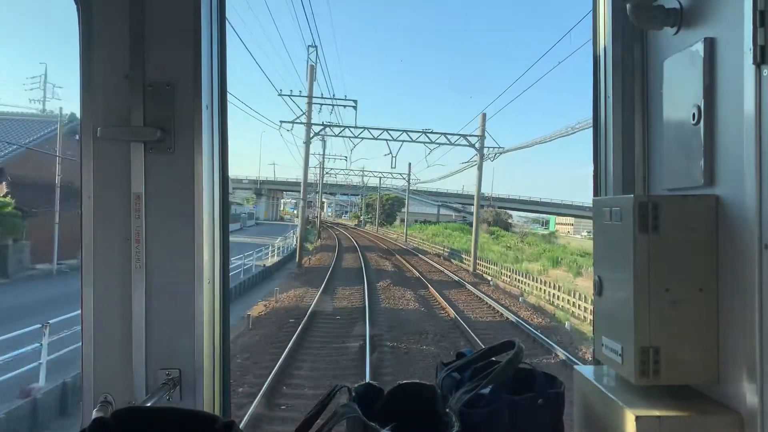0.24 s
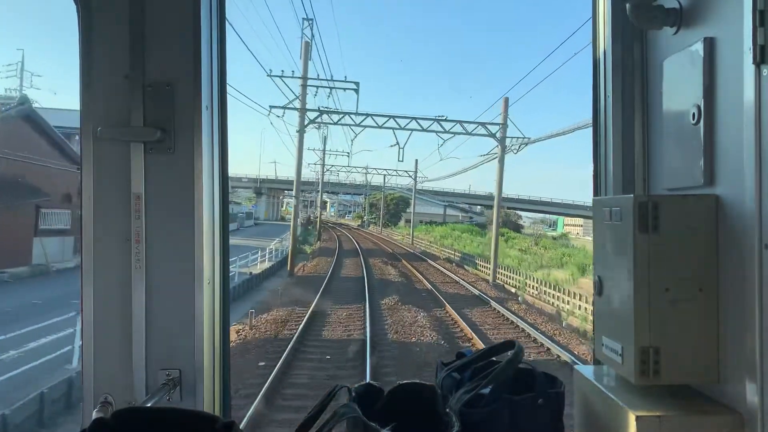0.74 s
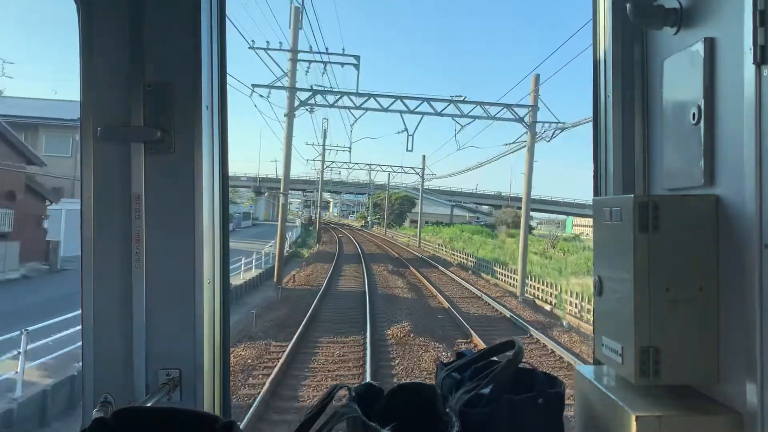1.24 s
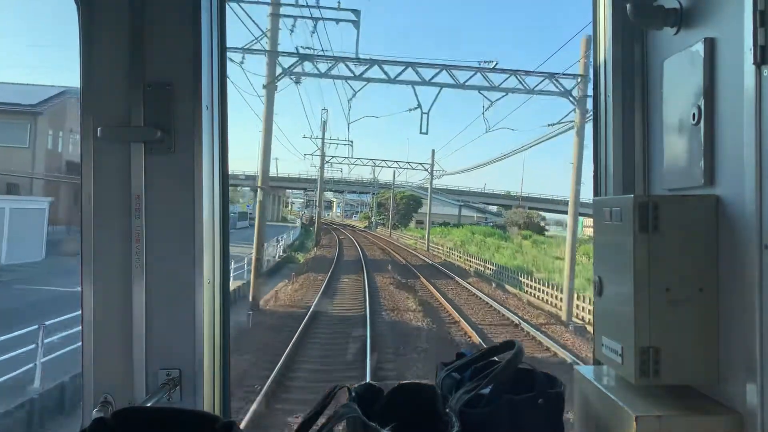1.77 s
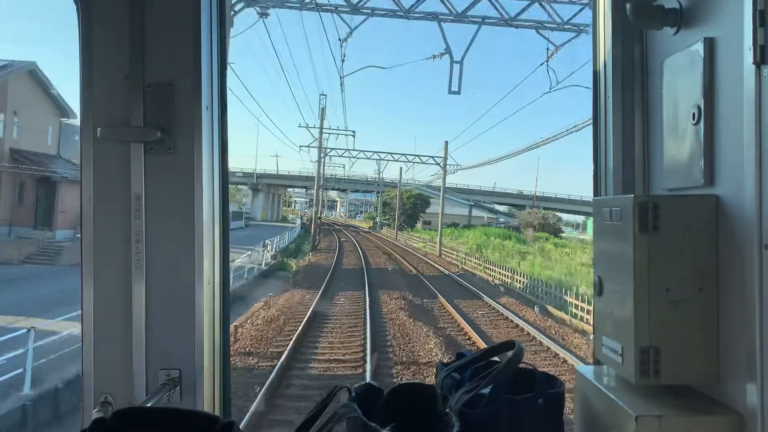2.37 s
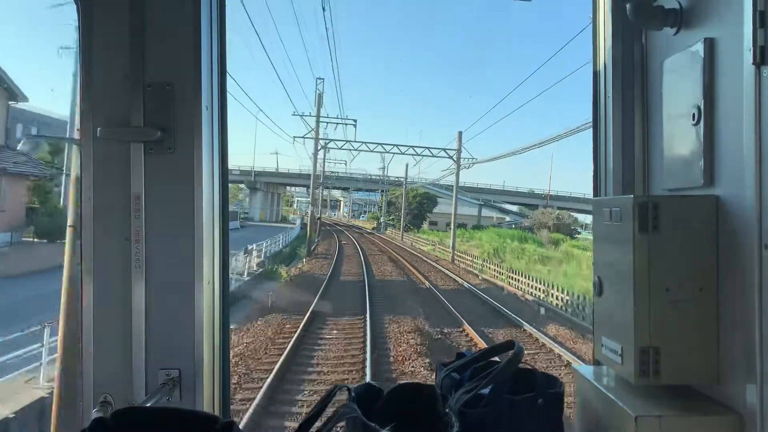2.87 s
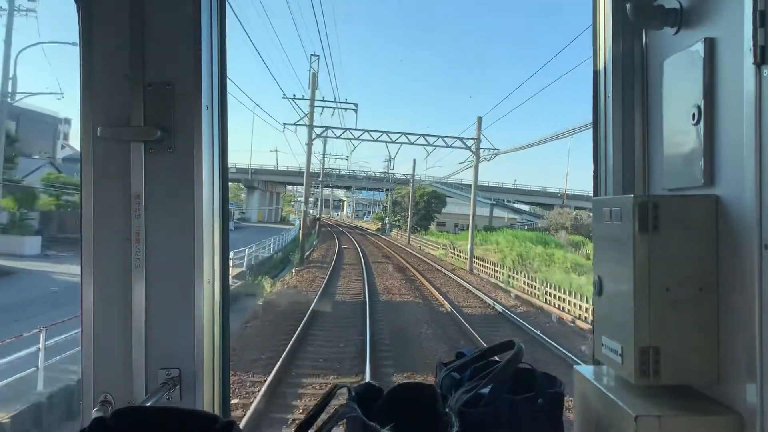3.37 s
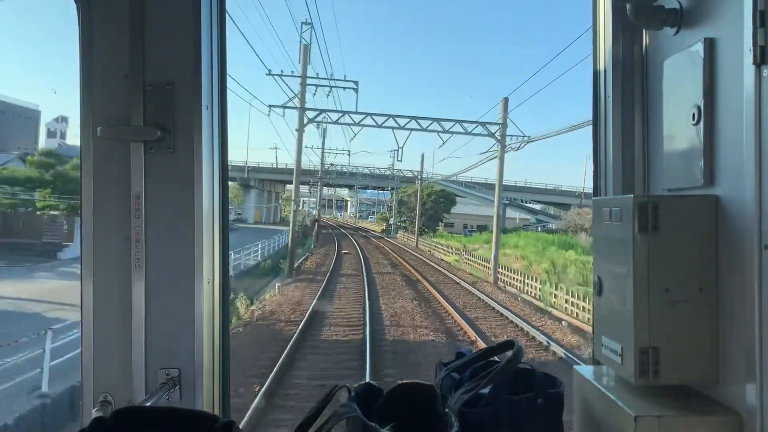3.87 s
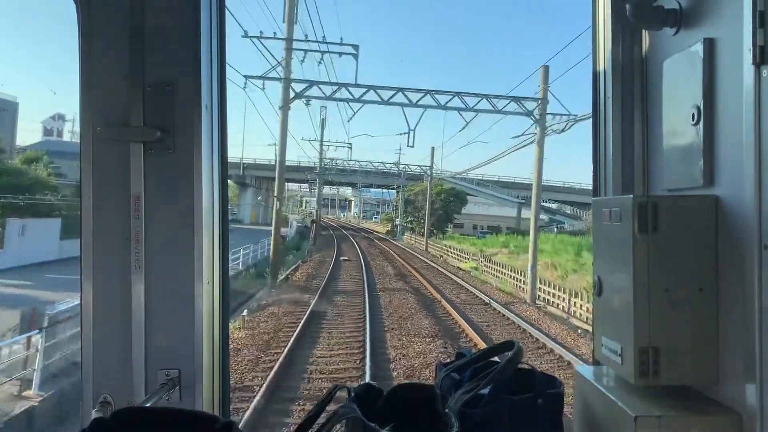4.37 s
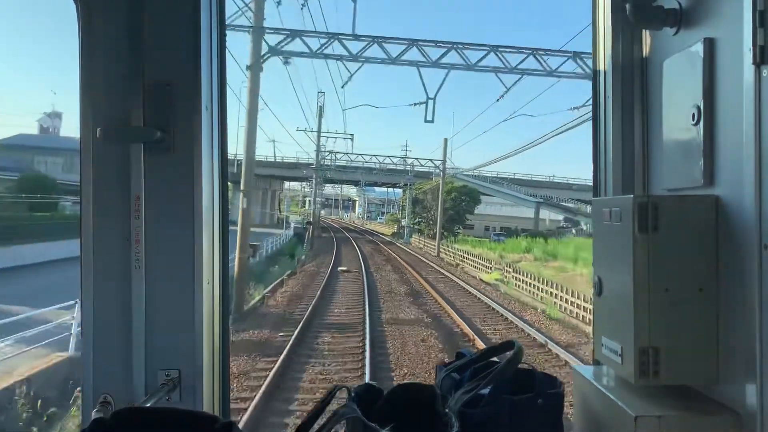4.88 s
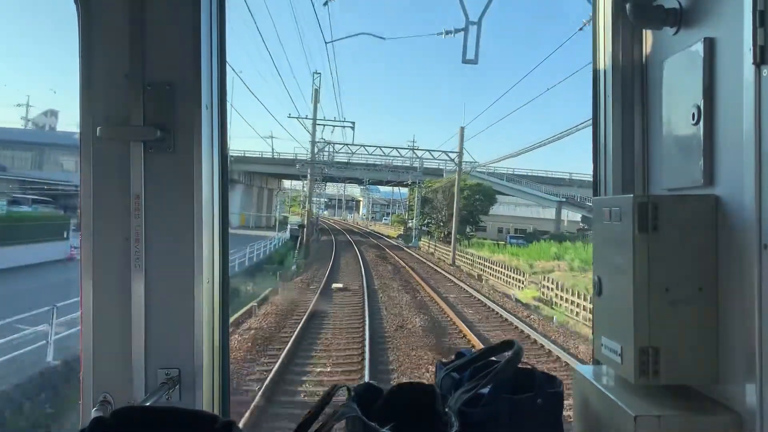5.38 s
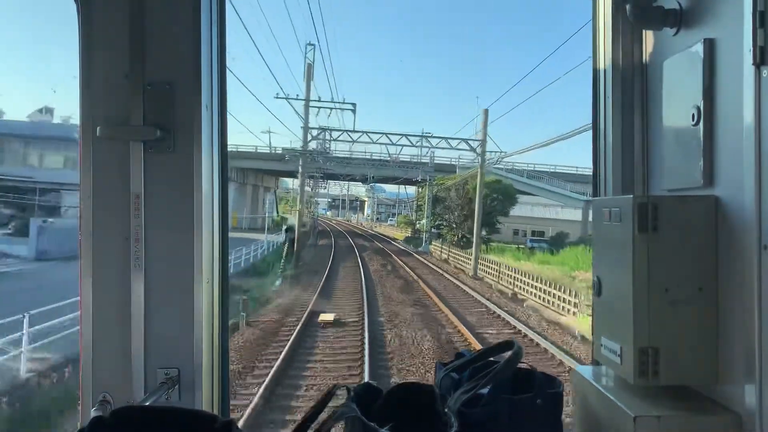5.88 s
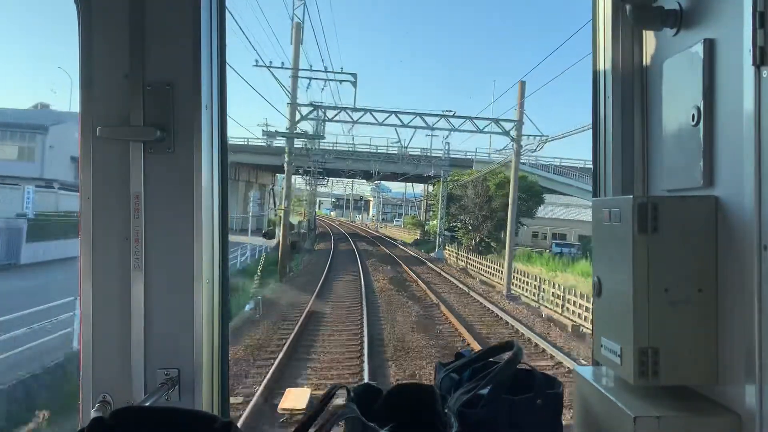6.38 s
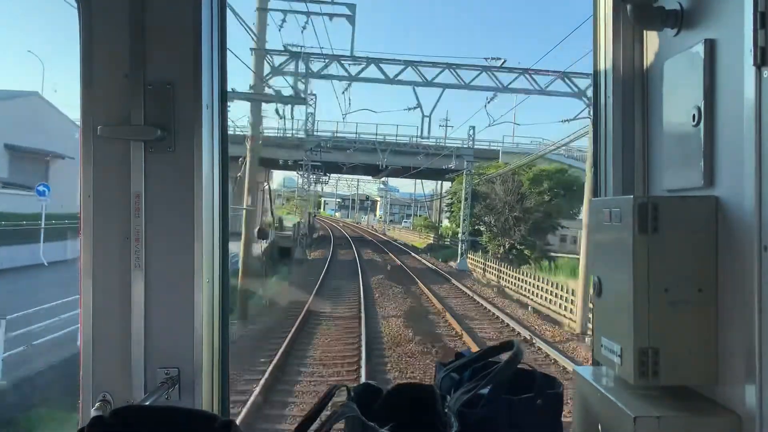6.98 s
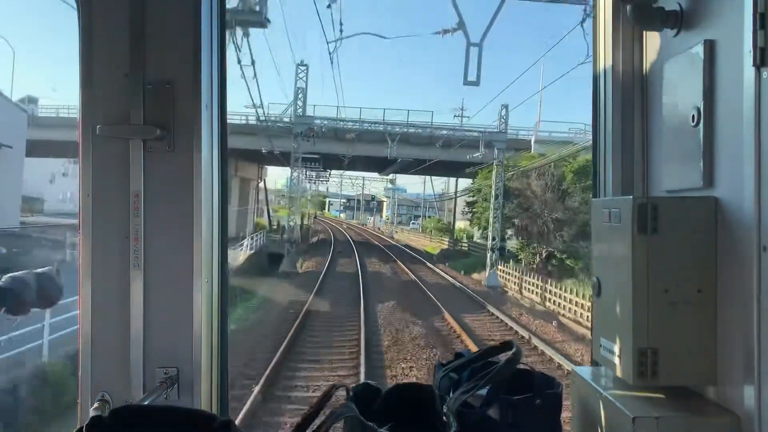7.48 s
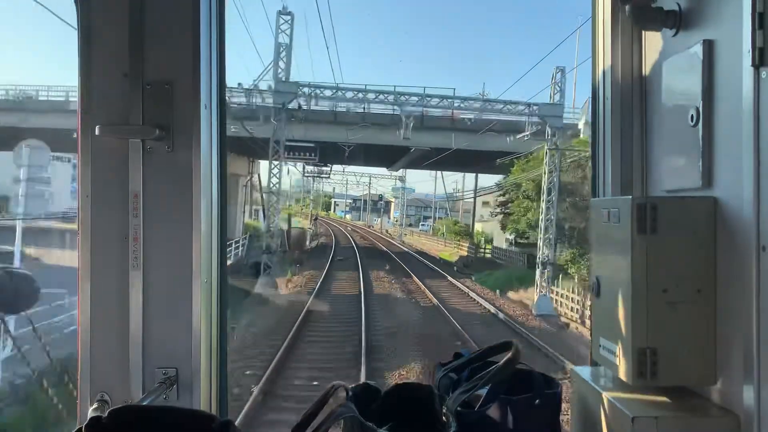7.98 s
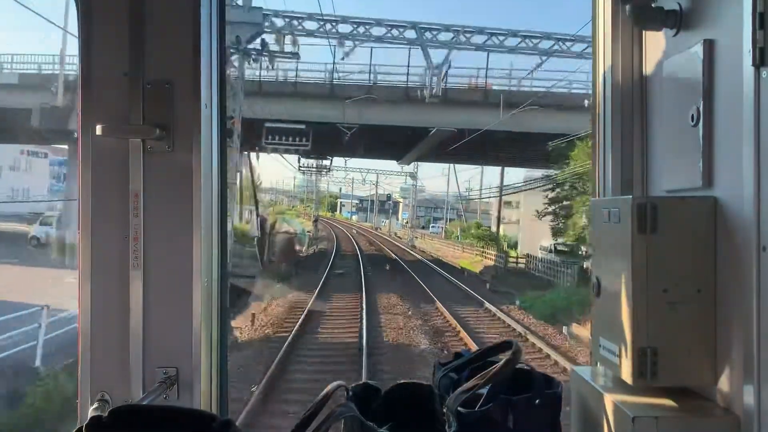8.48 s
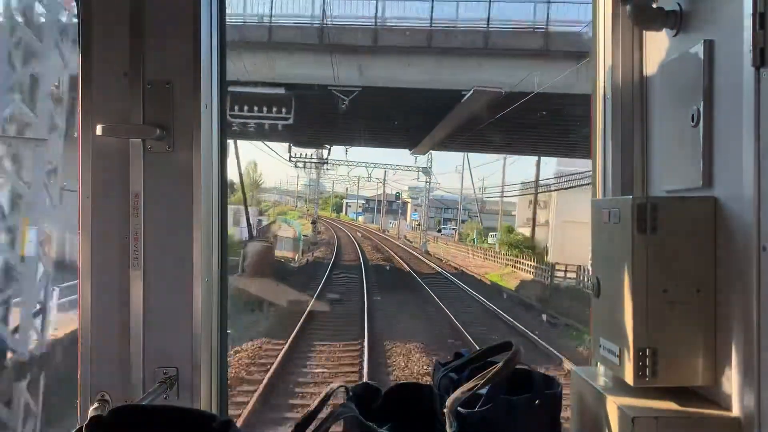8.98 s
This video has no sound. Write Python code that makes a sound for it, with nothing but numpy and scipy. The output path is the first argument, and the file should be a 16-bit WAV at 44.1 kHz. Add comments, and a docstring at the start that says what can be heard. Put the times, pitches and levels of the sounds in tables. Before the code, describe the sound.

Heard inside the front of an electric commuter train at steady speed. A deep, booming rumble and wheel roar never stop, under a low motor drone and a mid-pitched gear whine that flutters quickly. Around two to five seconds thin metallic flange hisses swell and cut off while the floor thumps in a cluster. Later the motor hum surges, more thumps follow, and the rail hiss rises slightly near a bridge. Wide, close stereo cab sound.

```python
"""The body and floor of an electric commuter train boom in resonance and thump over dips as it rolls in a bend.
Wheels roar and hiss as shaped noise; flanges hiss against the outer rail in swells that also ring the wheel.
Motor shafts drone as slowly beating tones, and two gear whines close in frequency beat against each other.
The auxiliary supply hums in even harmonics beside fans and two thin whines.
Cab fittings tick now and then as short decaying bursts; all is heard at two points in the cab."""
import sys
import numpy as np
from scipy import signal
from scipy.fft import rfft, irfft, next_fast_len
from scipy.io import wavfile
from scipy.ndimage import uniform_filter1d, map_coordinates

SR = 44100
rng = np.random.default_rng(int(sys.argv[2]) if len(sys.argv) > 2 else 0)


def wav_record(signal):
    """Record a signal, one row per channel, as 16-bit PCM in the file named by sys.argv[1]."""
    frames = np.transpose(np.atleast_2d(signal))
    bounded = np.clip(frames, -1, 1)
    # unit amplitude maps onto the largest positive 16-bit level
    quanta = np.round(bounded * 32767).astype(np.int16)
    wavfile.write(sys.argv[1], SR, quanta)


N = 407043
TIME = np.arange(N) / SR

# two listening points in the cab: [f/Hz, likeness 0-1, left lead/rad, left minus right level/dB]
PORTS = [(32, 0.95, -0.1, -2), (50, 0.92, 1, 0), (92, 0.96, -0.47, -2.5), (161, 0.87, 0.62, -5),
         (253, 0.51, 0, -1), (356, 0.86, 0.84, -1.5), (470, 0.49, 1, 1.3), (700, 0.44, 1.4, 0.7),
         (1030, 0.15, 1.75, 1), (1440, 0.41, 3.5, -1.5), (1696, 0.08, 5, 0.5), (2870, 0.39, 9.5, 3),
         (4350, 0.1, 12, 0), (5270, 0.31, 15, -3.5), (6750, 0.3, 20, -1.5), (7900, 1, 21, 0),
         (9370, 1, 22.5, 2), (12800, .9, 28.5, -0.5), (15300, .9, 26, -0.5)]

# auxiliary supply: fundamental f/Hz, its multiples, and their levels [rms level/dB]
SUPPLY_HZ = 59.217
SUPPLY_ORDERS = (2, 6, 12, 14, 16, 18, 24, 30, 32, 60, 72)
SUPPLY_LEVELS = [-43, -41.5, -65.5, -61, -66.5, -65, -66.5, -81, -67.5, -75.5, -78]
# fans and shaking panels: [f/Hz, rms level/dB, flutter 0-1]
FAN_LINES = [(29.8, -46.5, .4), (37.7, -49, .5), (151.1, -43.5, .7), (229.4, -54.5, 1), (328.8, -56.5, 0.2),
             (546, -52.5, .9), (1370, -68.5, 0.5)]
# two thin whines: [lower f/Hz, upper f/Hz] and [t/s, lower mean level/dB, upper mean level/dB]
WHINE_HZ = (1658.1, 1687.7)
WHINE_LEVELS = [(0, -63, -63), (0.8, -60, -56), (1.6, -65, -56), (2.1, -61, -62), (2.7, -59, -55.5),
                (4.9, -56.5, -55.5), (5.25, -66, -66), (5.8, -61, -57.5), (9.23, -59.5, -58.5)]
WHINE_WAVER_DB, WHINE_SWAY_HZ = 1.5, 2.2

# blows on cab fittings, before the tilt to the left: [t/s, crack level/dB, knock level/dB]
TICKS = [(1.911, -40.5, -48), (2.328, -42.5, -48), (5.759, -34.5, -46), (7.258, -34.3, -37)]
# ringing of the fittings: [f/Hz, width/Hz, level/dB]
FITTING_MODES = [(2600, 700, -4), (3400, 800, 0), (4250, 700, 0)]
# panel that carries them: [f/Hz, width/Hz, level/dB]
PANEL_MODES = [(1100, 400, -1), (1850, 600, 0)]

# first gearbox whine: [t/s, level/dB, left minus right level/dB]
FIRST_GEAR = [(0, -44.3, -3), (2.4, -42.7, -4), (2.7, -51, 0), (4.3, -54, 0), (4.65, -60, 0), (5.6, -50, 0),
              (7.45, -46, 1), (7.8, -58, 0), (8.3, -48, 0), (9.23, -49, 0)]
# second gearbox whine: [t/s, level/dB, left minus right level/dB]
SECOND_GEAR = [(0, -49.5, -1), (2.1, -49, -1), (2.8, -64, 0), (8.1, -62, 4), (8.8, -47, 10),
               (9.23, -45.5, 10)]
# phase lead of the left: [first gearbox/rad, second gearbox/rad]
GEAR_LEADS = (1.75, -.3)
# mean tooth rate of the first gearbox, creeping up with speed: [t/s, f/Hz]
GEAR_PITCH = [(0, 682.3), (9.23, 685)]
# how far the second gearbox lags the first: [t/s, beat f/Hz]
GEAR_BEATS = [(0, 8.2), (1.2, 8.2), (1.45, 6.1), (2.4, 5.4), (7.5, 6), (8.7, 10)]
GEAR_IN_STEP_S = 1.118  # a moment at which the two are in step

# motor shaft, first order: [t/s, mean level/dB]
SHAFT_FIRST = [(0, -33), (1.7, -38.5), (2.15, -51), (2.7, -34), (4.4, -35.5), (6.8, -41.5), (9.23, -55)]
# motor shaft, second order: [t/s, mean level/dB]
SHAFT_SECOND = [(0, -29), (1.4, -32.5), (2.45, -29.5), (3.0, -40.5), (3.7, -34.5), (4.7, -45), (5.25, -48),
                (5.7, -35.5), (6.25, -24.5), (6.95, -33.5), (7.3, -40), (8.3, -45.5), (8.85, -35),
                (9.23, -36)]
# where each of the three orders stands: [left lead/rad, left minus right level/dB]
SHAFT_PLACES = [(-.1, -2.7), (.5, -4), (.35, -5)]
# third order of two motors: level before beating, beat period, a moment in step, depth 0-1
THIRD_DB, BEAT_S, IN_STEP_S, BEAT_DEPTH = -38.5, 2.18, 1.24, 0.85
MOTOR_WANDER_DB = 1

# ringing of the wheel: [f/Hz, width/Hz, level/dB]
WHEEL_MODES = [(4320, 70, -4), (4730, 90, -7), (5020, 60, -3), (5137, 45, -1.5), (5237, 35, 1.5),
               (5329, 35, 0), (5473, 40, -5), (5675, 60, -2), (5866, 40, -4.5), (6105, 70, -5),
               (6355, 45, -4), (6845, 45, -1.5), (7035, 50, -7), (7280, 70, -10), (7580, 60, -12)]
# steel scraping on steel: [f/Hz, level/dB per Hz]
SCRAPE_SPECTRUM = [(2000, -25), (3500, -2), (4500, 0), (5400, 0), (6500, -1), (7500, -3), (8200, -7),
                   (9300, -13), (10300, -5), (11300, -17), (13000, -20), (15700, -20)]
# sizzle that grows with hard pressure: [f/Hz, level/dB per Hz]
SIZZLE_SPECTRUM = [(8500, -40), (10300, 0), (11500, -12), (13300, -10), (14800, 1), (15700, 4)]
# flange leaning on the rail: [start t/s, build-up/s, hold/s, relative level/dB]
FLANGE_RUBS = [(1.8, 0.29, 0.23, -53.5), (2.195, 0.45, 0.8, -47.5), (2.6, 0.48, .4, -47),
               (3.693, 0.13, 0.29, -47.5), (4.441, 0.48, 0.045, -47.5), (5.277, .11, .14, -54),
               (6.75, 0.18, 0.019, -53)]
RELEASE_DB_PER_S, BRUSH_DB = 87.5, -78.5  # letting go; relative level in between

# wheel on rail, heard through the shell: [f/Hz, level/dB per Hz]
ROAR_SPECTRUM = [(100, -44.5), (190, 2.5), (260, 3), (300, 0), (335, 1.5), (405, -1), (428, -4), (455, -1),
                 (478, -4), (510, 0.5), (550, 1.5), (578, -1), (615, 1), (655, -3), (680, -6.5),
                 (705, -8.5), (745, -1), (815, -4), (852, 1), (900, -9), (948, -3.5), (1070, -9),
                 (1280, -6), (1500, -12.5), (2300, -32), (5000, -54.5)]
# rail hiss: [f/Hz, level/dB per Hz]
HISS_SPECTRUM = [(900, -30), (1450, -3), (1670, 3), (2000, 0), (2350, -3), (2750, -1.5), (3500, -5),
                 (4200, -9), (6000, -17), (7100, -18.5), (8000, -25), (8800, -25.5), (9600, -33.5),
                 (15700, -55)]
# the bridge ahead throws back more hiss: [from t/s, fully by t/s, gain/dB]
BRIDGE = (7.3, 8.5, 1.1)
ROAR_DB, HISS_DB, ROLL_WANDER_DB = -35, -45.5, 0.35  # mean levels and their slow wander

# dips in the track that thump the floor: [crest t/s, peak level/dB, f/Hz]
JOLTS = [(1.06, -28, 122), (1.425, -23, 123), (1.846, -21.5, 144), (2.029, -22, 113), (2.155, -26, 84),
         (2.297, -22, 100), (2.412, -23.5, 85), (2.575, -23, 96), (3.689, -26.5, 94), (4.428, -22.5, 127),
         (6.015, -23.5, 150), (6.157, -25, 126), (6.82, -27, 107), (6.935, -26, 92), (7.089, -21.5, 150.8),
         (7.469, -24.5, 114), (7.669, -26, 132), (8.944, -25.5, 119)]
JOLT_RISE_S, JOLT_SINK_DB = 0.01993, -6.5  # rise; the body's share an octave below

# low resonances of the car body: [f/Hz, width/Hz, level/dB]
BODY_MODES = [(38.5, 9, -4), (75, 18, 3), (99, 16, 0.5)]
# resonances of the floor: [f/Hz, width/Hz, level/dB]
FLOOR_MODES = [(126, 3.8, 0), (144.9, 9.6, 0.5), (180, 33, -13)]
# track roughness felt in the car body: [t/s, rumble level/dB]
RUMBLE = [(0, -37), (1.95, -36.5), (2.2, -33), (2.7, -34), (6.2, -34), (6.8, -32), (9.23, -31.5)]
BOOM_DB = -33  # floor level
JOSTLE_DB, JOSTLE_RATE = 1.8, 16  # random surges: scale in dB, knots a second

TOP_HZ, EASE_IN_S = 15750, .006


def amp(db):
    """Level law: decibels to amplitude ratio."""
    return 10 ** (np.asarray(db) / 20)


def unit(x):
    """Normalisation: x at rms 1."""
    return x / np.sqrt(np.mean(np.abs(x) ** 2) + 1e-20)


def along(points, hz):
    """Interpolation on a log-frequency axis: each column after the frequency."""
    f, *columns = np.transpose(points)
    return np.array([np.interp(np.log(hz + 1), np.log(f), c) for c in columns])


def curves(rows):
    """Linear interpolation in time: each column after the time, sample by sample."""
    s, *columns = np.transpose(rows)
    return np.array([np.interp(TIME, s, c) for c in columns])


def wobble(rate):
    """Slow random modulation: a smooth curve through random knots, rate knots a second."""
    coarse = TIME[::64]
    knots = rng.standard_normal(512)
    return np.interp(TIME, coarse, map_coordinates(knots, [coarse * rate], mode="wrap"))


def filtered(x, response):
    """Linear filtering: the spectrum of x times a response of frequency."""
    m = next_fast_len(N + SR // 4)
    return irfft(rfft(x, m) * response(np.fft.rfftfreq(m, 1 / SR)), m)[..., :N]


def slope(points):
    """Spectral envelope: the response of a smooth (f/Hz, level/dB) spectrum."""
    return lambda f: amp(along(points, f)[0])


def resonances(modes):
    """Modal superposition: damped resonances of alternating sign."""
    def response(f):
        total = 0
        for k, (centre, width, db) in enumerate(modes):
            mode = 1j * f * width / (centre ** 2 - f ** 2 + 1j * f * width)
            total = total + (-1) ** k * amp(db) * mode
        return total
    return response


def standing_waves(f, depth_db, spacing_hz):
    """Dense cab modes: each listening point has its own fine peaks and notches."""
    grid = np.linspace(0, SR / 2, int(SR / 2 / spacing_hz))
    rows = rng.standard_normal((2, len(grid)))
    return amp(depth_db * np.array([np.interp(f, grid, row) for row in rows]))


def cab_noise(response):
    """Spatial coherence: coloured noise of rms 1 whose likeness at two points depends on frequency."""
    m = next_fast_len(N)
    f = np.fft.rfftfreq(m, 1 / SR)
    alike, lead, balance_db = along(PORTS, f)
    alike = np.clip(alike, 0, 1)
    shared, private = rfft(rng.standard_normal((2, m)))
    right = alike * shared * np.exp(-1j * lead) + np.sqrt(1 - alike ** 2) * private
    ports = np.array([shared * amp(balance_db / 2), right * amp(-balance_db / 2)])
    return unit(irfft(ports * response(f), m)[:, :N])


def patchy(x, depth_db, across_hz, seconds):
    """Random modulation in time and frequency: patches of gain come and go; rms 1."""
    hz, t, z = signal.stft(x, SR, nperseg=512)
    knots = rng.standard_normal((int(SR / 2 / across_hz) + 2, int(t[-1] / seconds) + 2))
    places = np.meshgrid(hz / across_hz, t / seconds, indexing="ij")
    gain_db = depth_db * unit(map_coordinates(knots, places, order=1))
    return unit(signal.istft(z * amp(gain_db), SR, nperseg=512)[1][:, :N])


def steady(x, seconds=0.28):
    """Power levelling: x with its slow swells evened out, at rms 1."""
    power = uniform_filter1d(np.mean(x ** 2, axis=0), int(seconds * SR))
    return unit(x / np.sqrt(np.abs(power) + 1e-9))


def tone(hz, flutter, flutter_rate, drift_hz, place=None, ahead=0):
    """Multipath scattering: a machine line of rms 1, fluttering differently at each point in the shaking car."""
    alike, *usual = along(PORTS, np.mean(hz))
    lead, balance_db = usual if place is None else place
    alike = np.clip(alike, 0, 1)

    def scatter():
        return wobble(flutter_rate) + 1j * wobble(flutter_rate)

    shared = scatter()
    right = alike * shared + np.sqrt(1 - alike ** 2) * scatter()
    paths = 1 + flutter * np.array([shared, right])
    side = np.array([[.5], [-.5]])
    ports = amp(side * balance_db) * np.exp(1j * side * lead)
    phase = ahead + 2 * np.pi * np.cumsum(hz + drift_hz * wobble(0.97)) / SR
    return unit((paths * ports * np.exp(1j * phase)).real)


def machinery():
    """Harmonic series: the supply hums in even multiples, fans drone, and two thin whines waver."""
    supply = sum(amp(db) * tone(order * SUPPLY_HZ, flutter=.15, flutter_rate=6, drift_hz=.1)
                 for order, db in zip(SUPPLY_ORDERS, SUPPLY_LEVELS))
    fans = sum(amp(db) * tone(hz, flutter, flutter_rate=6, drift_hz=.15)
               for hz, db, flutter in FAN_LINES)
    whines = 0
    for hz, db in zip(WHINE_HZ, curves(WHINE_LEVELS)):
        gain = amp(db + WHINE_WAVER_DB * wobble(12))
        swaying_hz = hz + WHINE_SWAY_HZ * wobble(14)
        whines = whines + gain * tone(swaying_hz, flutter=.65, flutter_rate=26, drift_hz=1.5)
    return supply + fans + whines


def fittings():
    """Impulse response: loose fittings on the left crack and knock their panel, with exponential decay."""
    def blow(s):
        t = np.abs(TIME - s)
        # a fast 60 dB decay in 16 ms over a fainter one in 80 ms
        decay = amp(-60 * t / .016) + amp(-18 - 60 * t / .08)
        return decay * (TIME >= s)

    cracks = sum(amp(db) * blow(s) for s, db, _ in TICKS) * cab_noise(resonances(FITTING_MODES))
    knocks = sum(amp(db) * blow(s) for s, _, db in TICKS) * cab_noise(resonances(PANEL_MODES))
    to_left = amp([[1.5], [-1.5]])
    return filtered((cracks + knocks) * to_left, lambda f: 1 / (1 + (f / 5000) ** 14))


def gear():
    """Interference: a second, slightly lower gear whine beats with the first, pulsing from side to side."""
    def whine(hz, place, ahead):
        return tone(hz, flutter=.14, flutter_rate=20, drift_hz=0, place=place, ahead=ahead)

    first_db, first_balance_db = curves(FIRST_GEAR)
    second_db, second_balance_db = curves(SECOND_GEAR)
    hz = curves(GEAR_PITCH)[0] + .3 * wobble(2)
    beats = curves(GEAR_BEATS)[0]
    # start the second whine ahead by the phase it loses before the moment in step
    in_step = 2 * np.pi * np.interp(GEAR_IN_STEP_S, TIME, np.cumsum(beats) / SR)
    first = whine(hz, (GEAR_LEADS[0], first_balance_db), 0)
    second = whine(hz - beats, (GEAR_LEADS[1], second_balance_db), in_step)
    return amp(first_db) * first + amp(second_db) * second


def motor(shaft_hz=55.32):
    """Shaft orders: motors drone at three multiples of rotation; two slipping in phase make the third beat."""
    beat_power = 1 + BEAT_DEPTH * np.cos(2 * np.pi * (TIME - IN_STEP_S) / BEAT_S)
    third_db = THIRD_DB + 10 * np.log10(beat_power)
    levels_db = curves(SHAFT_FIRST)[0], curves(SHAFT_SECOND)[0], third_db
    drone = 0
    for order, (db, place) in enumerate(zip(levels_db, SHAFT_PLACES), 1):
        gain = amp(db + MOTOR_WANDER_DB * wobble(3.02))
        drone = drone + gain * tone(order * shaft_hz, flutter=.3, flutter_rate=14, drift_hz=.2, place=place)
    return drone


def flange_grip():
    """Contact pressure as relative level/dB: each rub builds linearly in amplitude, holds, then decays."""
    rubs = []
    for start, build, hold, db in FLANGE_RUBS:
        rise = np.clip((TIME - start) / build, 0, 1)
        since_release = np.maximum(TIME - start - build - hold, 0)
        rubs.append(rise * amp(db - RELEASE_DB_PER_S * since_release))
    return 20 * np.log10(np.maximum(np.max(rubs, axis=0), amp(BRUSH_DB)))


def flange(ring_db=-2, scrape_db=-1, level_db=-3, bite=0.7, sizzle_db=-12):
    """Stick-slip friction: the flange rings the wheel and, pressed harder, scrapes brighter."""
    grip_db = flange_grip()
    ring = cab_noise(lambda f: resonances(WHEEL_MODES)(f) * standing_waves(f, depth_db=2.5, spacing_hz=12))
    ring = patchy(ring, depth_db=2.6, across_hz=100, seconds=.04)
    scrape = cab_noise(lambda f: slope(SCRAPE_SPECTRUM)(f) * standing_waves(f, depth_db=2.5, spacing_hz=25))
    scrape = patchy(scrape, depth_db=2.4, across_hz=160, seconds=.04)
    sizzle = patchy(cab_noise(slope(SIZZLE_SPECTRUM)), depth_db=2, across_hz=300, seconds=.05)
    brightness_db = bite * (grip_db - grip_db.max())
    ringing = amp(ring_db) * ring
    scraping = amp(scrape_db + brightness_db) * scrape
    sizzling = amp(sizzle_db + 2 * brightness_db) * sizzle
    return amp(grip_db + level_db + 0.37 * wobble(22)) * (ringing + scraping + sizzling)


def rolling():
    """Roughness excitation: wheels roar and hiss on the rail head; reflection at the bridge adds hiss."""
    roar = patchy(cab_noise(slope(ROAR_SPECTRUM)), depth_db=1.7, across_hz=90, seconds=.05)
    hiss = cab_noise(lambda f: slope(HISS_SPECTRUM)(f) * standing_waves(f, depth_db=1, spacing_hz=14))
    hiss = patchy(hiss, depth_db=.85, across_hz=600, seconds=.045)
    near_s, full_s, echo_db = BRIDGE
    hiss_db = HISS_DB + np.interp(TIME, (near_s, full_s), (0, echo_db))
    roar_gain = amp(ROAR_DB + ROLL_WANDER_DB * wobble(1.63))
    hiss_gain = amp(hiss_db + ROLL_WANDER_DB * wobble(1.6))
    return roar_gain * roar + hiss_gain * hiss


def jolts():
    """Transient response: dips thump the sprung floor in short swells; the body sinks an octave below."""
    out = np.zeros((2, N + SR))
    t = np.arange(SR // 4) / SR
    swell = (t / JOLT_RISE_S * np.exp(1 - t / JOLT_RISE_S)) ** 2  # crest of 1 at the rise time
    for s, db, pitch in JOLTS:
        first = round((s - JOLT_RISE_S) * SR)
        for hz, part_db in (pitch, 0), (pitch / 2, JOLT_SINK_DB):
            _, lead, balance_db = along(PORTS, hz)
            balance = amp([[balance_db / 2], [-balance_db / 2]])
            ports = balance * np.sin(2 * np.pi * hz * t - np.array([[0], [lead]]))
            out[:, first:first + len(t)] += amp(db + part_db) * swell * ports
    return out[:, :N]


def car_body(low_hz=27, body_top_hz=118, floor_top_hz=200):
    """Forced resonance: track roughness shakes body and floor, each surging by itself as the car lurches."""
    def lurch():
        return amp(JOSTLE_DB * wobble(JOSTLE_RATE))

    def body_response(f):
        high_pass = 1 - 1 / (1 + (f / low_hz) ** 8)
        return resonances(BODY_MODES)(f) * high_pass / (1 + (f / body_top_hz) ** 8)

    def floor_response(f):
        return resonances(FLOOR_MODES)(f) / (1 + (f / floor_top_hz) ** 8)

    body = steady(lurch() * cab_noise(body_response))
    floor = steady(lurch() * cab_noise(floor_response))
    return amp(curves(RUMBLE)[0]) * body + amp(BOOM_DB) * floor


def scene():
    """Superposition: everything that reaches the front of the car."""
    background = machinery() + fittings()
    drive = gear() + motor()
    track = flange() + rolling()
    return background + drive + track + jolts() + car_body()


def record(dry):
    """Band limitation: the sound eases in and keeps nothing from TOP_HZ upward."""
    return filtered(dry * np.minimum(TIME / EASE_IN_S, 1), lambda f: f < TOP_HZ)


dry = scene()
out = record(dry)
wav_record(out)
```